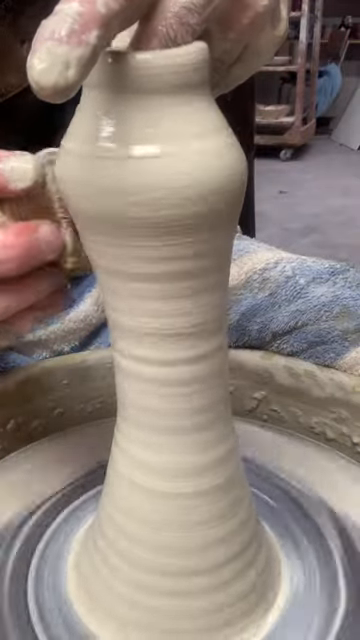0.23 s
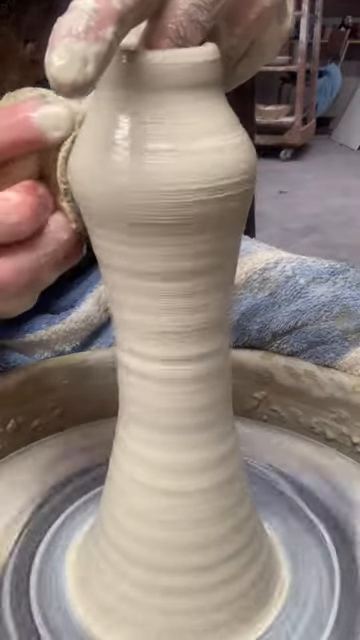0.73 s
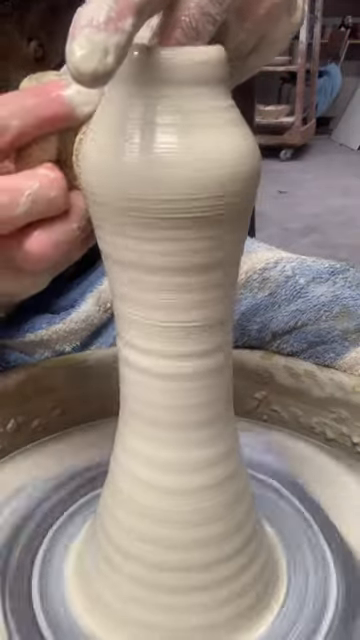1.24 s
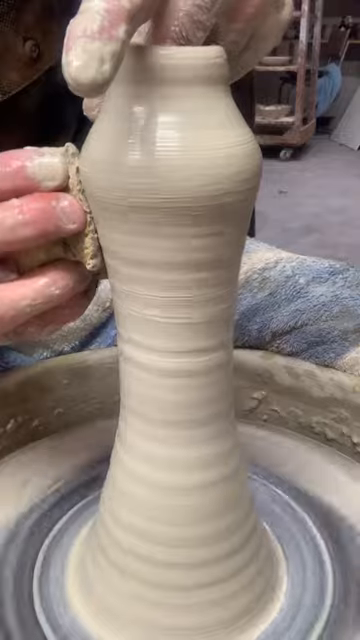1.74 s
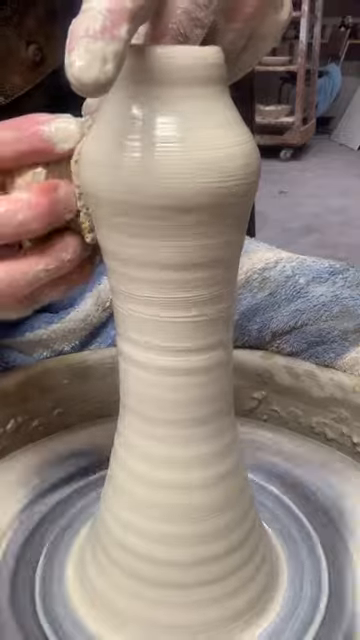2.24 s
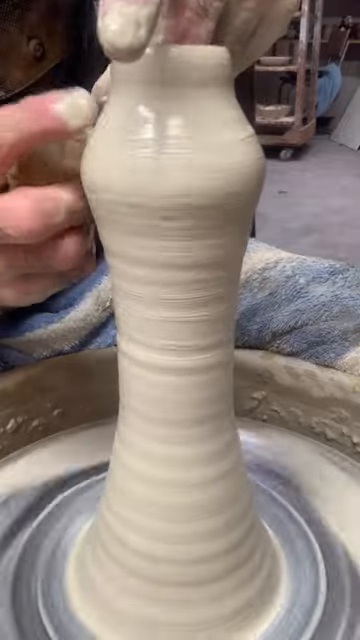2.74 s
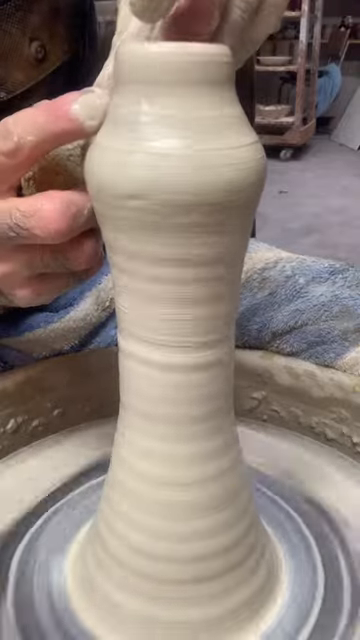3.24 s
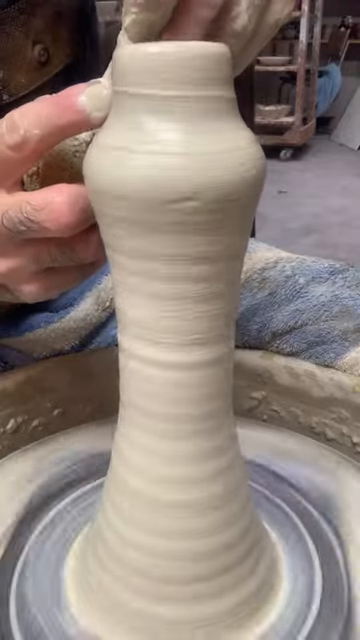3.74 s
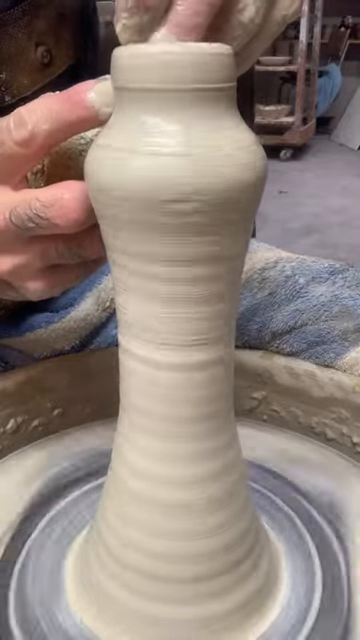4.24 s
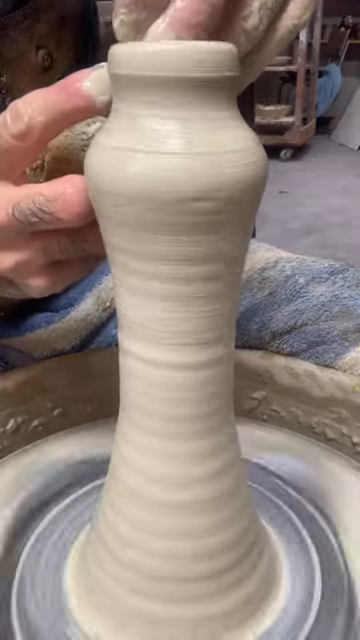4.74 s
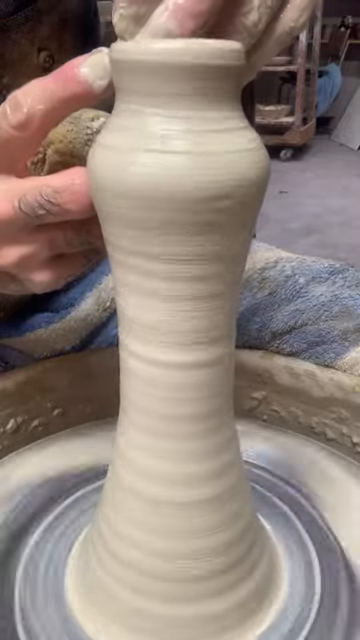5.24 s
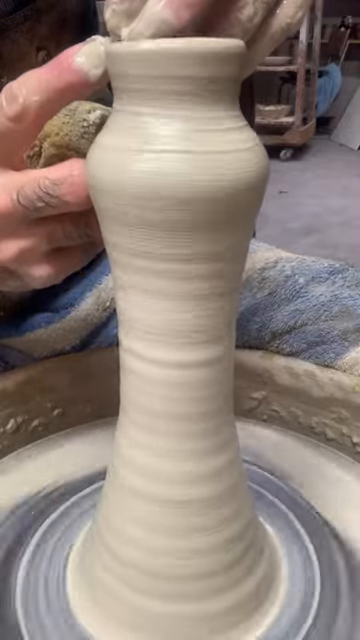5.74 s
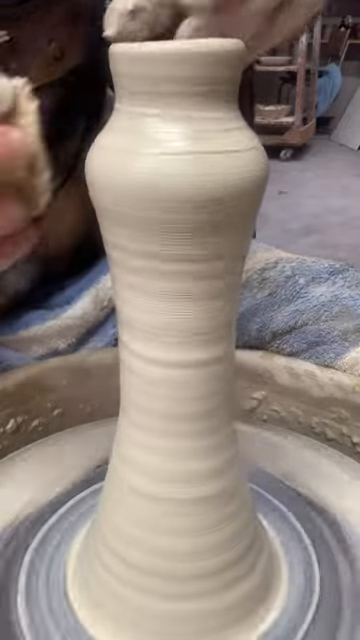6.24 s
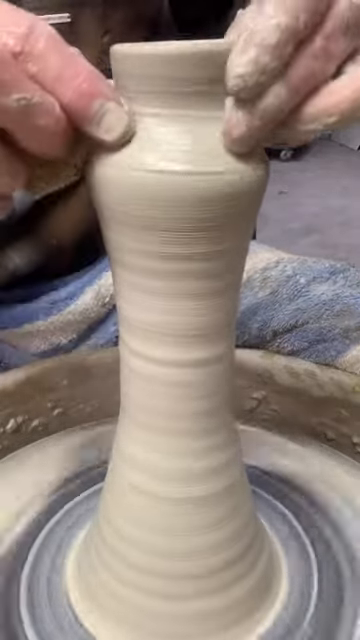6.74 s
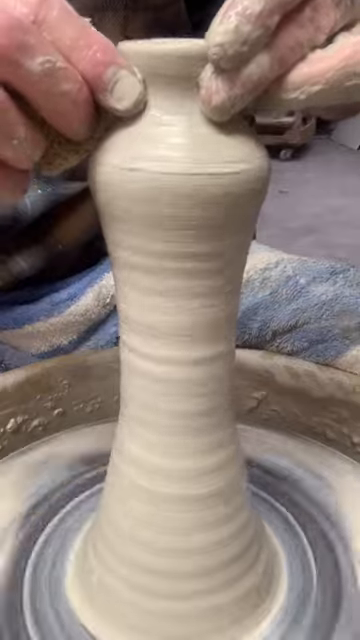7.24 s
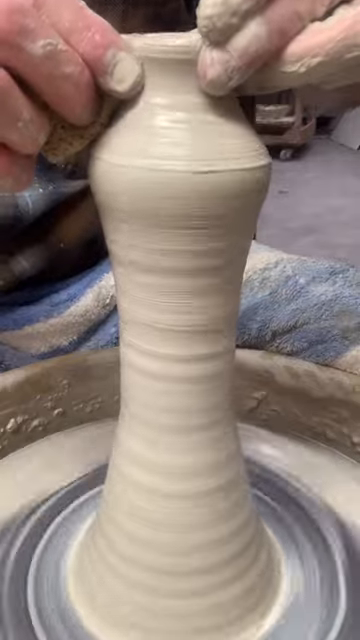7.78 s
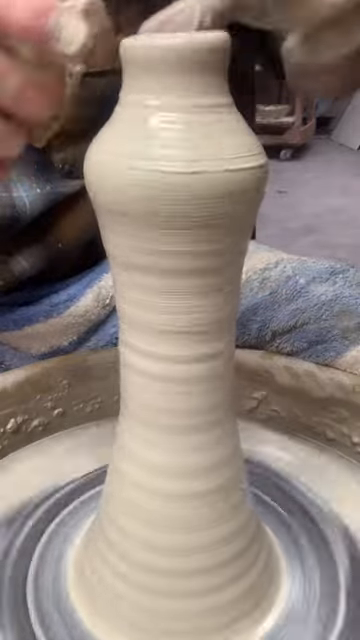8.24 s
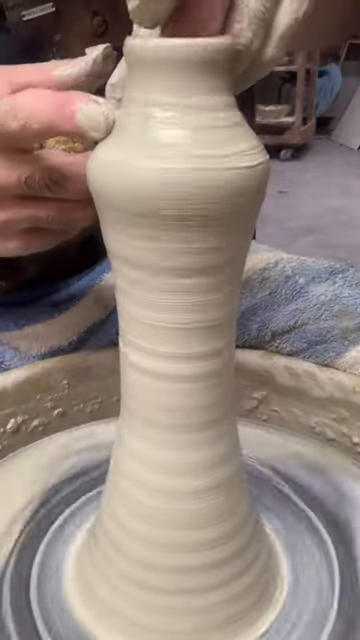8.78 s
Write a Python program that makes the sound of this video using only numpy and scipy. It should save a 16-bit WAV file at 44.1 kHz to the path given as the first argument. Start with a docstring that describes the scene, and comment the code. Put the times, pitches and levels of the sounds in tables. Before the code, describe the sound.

Continuous low motor hum and buzz from an electric potter's wheel, recorded within arm's reach. Soft, uneven low thumps recur with the turning head, over a muted belt drone. The thin motor whine dips slightly near the middle and recovers. Quiet high rasping and hiss flutter quickly, with scattered little chirps and very faint strokes of sponge and fingers on wet clay. Little room sound, no talking.

```python
"""The hum and buzz of an electric pottery wheel at throwing speed, close to the microphones, in a studio.
Rectified mains drives the hum and shakes the motor housing; the shaft whines, the brushes rasp and chirp.
The wheel head bumps and rumbles at two tight spots a turn, over a belt drone and dull knocks in the frame.
A wet sponge and fingers swish faintly on the turning clay.
Tones are sines in turn with the parts; the rest is stereo noise, coloured and swelled."""
import sys
import numpy as np
from scipy import signal
from scipy.fft import rfft, irfft, next_fast_len
from scipy.io import wavfile
from scipy.ndimage import uniform_filter1d, map_coordinates

SR = 44100
rng = np.random.default_rng(int(sys.argv[2]) if len(sys.argv) > 2 else 0)


def master(y):
    """Save y as 16-bit WAV."""
    cut = np.clip(np.atleast_2d(y).T, -1, 1)
    pcm = np.round(cut * 32767)  # scale
    wavfile.write(sys.argv[1], SR, pcm.astype(np.int16))


N = 397341
TIME = np.arange(N) / SR
RECTIFIED_MAINS_HZ = 119.968
SHAFT_TURNS_PER_WHEEL_TURN, SHAFT_TURNS_PER_BELT_LAP = 12.6, 7.87
# motor shaft: t/s, speed/(turns per s), whine level/dB
SHAFT_RUN = [(0, 19.9, -54.5), (1.6, 19.9, -50.5), (2.3, 19.7, -51.5), (2.9, 20.1, -51), (3.6, 19.8, -50),
             (4, 19.2, -50), (4.35, 18.82, -48.5), (5, 19.08, -49), (6, 19.25, -47.5), (7, 19.33, -47.5),
             (7.7, 19.35, -50.5), (8.3, 19.2, -47), (9, 19.5, -49.5)]


def hum(waver_db=2.0, sway_cycles=0.013, low_waver_db=0.87, throb_waver_db=1.0, side_waver_db=3):
    """Magnetic pull at twice the mains rate; multiple 1 swells with hands, wheel, belt; 2 throbs with wheel."""
    # motor hum: multiple of rectified mains, level/dB, left-right/dB, left lead/rad
    partials = [(1, -19.2, .6, 0), (2, -33.2, -.3, -.5), (3, -52.5, -5, -2.7), (4, -43.2, -5, -1.5),
                (5, -59.5, -8, -2.3), (6, -52.5, 0, 3.1), (7, -62.5, -1, 3), (8, -62, 0, -1),
                (9, -57.5, .8, -1.2), (12, -67, 2, -1.8)]
    # weaker tones beside it: f/Hz, level/dB, left-right/dB, left lead/rad
    side_tones = [(220, -56, -2.6, -.4), (260, -45, -1.8, -.6), (440, -58, -2.8, -1.3),
                  (500, -56.5, -3.9, -1.6), (540, -64, -3, -1.9)]
    # hands loading the motor: t/s, level added to multiple 1/dB
    load = [(0, -1), (.75, 2), (1.15, -0.3), (1.5, 1.2), (2.2, 0), (2.65, 1.4), (3.7, 0), (3.92, -0.5),
            (4.15, 1), (5.0, -0.6), (5.9, 2.5), (6.55, -1.2), (7.25, -1), (7.85, 1.5), (8.15, -1.6),
            (9, -1)]
    (load_db,) = curves(load)
    wheel = wheel_turns()
    level_db = [db + waver_db * wobble(5.6) for _, db, _, _ in partials]

    level_db[0] = partials[0][1] + load_db + low_waver_db * wobble(9)
    level_db[0] += swing(wheel, depth_db=1.0, place=0.52)
    level_db[0] += swing(belt_laps(), depth_db=1.1, place=0.66)

    level_db[1] = partials[1][1] + throb_waver_db * wobble(12)
    level_db[1] += swing(wheel, depth_db=1.1, place=0.87)
    level_db[1] += swing(2 * wheel, depth_db=3.6, place=0.93)

    out = np.zeros((2, N))
    for (k, _, pan_db, lead), db in zip(partials, level_db):
        cycles = k * RECTIFIED_MAINS_HZ * TIME + sway_cycles * wobble(8)
        out += amp(db) * tone(cycles, pan_db, lead)
    for hz, db, pan_db, lead in side_tones:
        cycles = hz * TIME + 0.019 * wobble(5)
        out += amp(db + side_waver_db * wobble(5.0)) * tone(cycles, pan_db, lead)
    return out


def wheel_head(lumpy_db=2.0):
    """The loaded head bumps at tight spots, then rocks and shakes the frame; dull knocks add to the shaking."""
    # slow rumble level: t/s, level added/dB
    rumble_level = [(0, 2), (.25, -4), (.55, 2), (1.15, 1), (1.75, -3.5), (2.5, 2.5), (3.05, -2.5),
                    (3.5, -2.5), (4.35, 1), (5, -3.5), (5.7, 0.5), (7.1, -2.5), (7.6, 2.5), (8.2, -1.5),
                    (9, 1.5)]
    # dull frame knocks: t/s, level/dB
    knock_list = [(0.551, -24), (.83, -22.5), (5.28, -25.5), (5.69, -25), (7.26, -21.5), (8.96, -23)]
    # spectra of rumble, frame, bumps: f/Hz, relative density/dB
    rumble_spectrum = [(18, -30), (30, -36.5), (35, -15), (43, -1), (48, -9.5), (57, -4), (64, -16.5),
                       (90, -44), (200, -92.5)]
    frame_spectrum = [(45, -44.5), (66, -9.5), (82, 6.5), (95, -2), (110, 2), (135, -7.5), (180, -26.5),
                      (400, -75)]
    bump_spectrum = [(150, -32.5), (240, -3), (290, 4.5), (350, -5.5), (410, -5.5), (480, -20),
                     (800, -55.5)]
    rumble_db, frame_db, frame_jolt_db = -27.5, -30, -13  # two floors; frame's part of each jolt
    bumps, jolts = tight_spots()
    laps = belt_laps()
    (level_db,) = curves(rumble_level)

    swell_db = level_db + swing(laps, depth_db=0.62, place=0.93) + lumpy_db * wobble(9.5)
    rocking = amp(swell_db) * np.hypot(amp(rumble_db), jolts)
    shaking = np.hypot(amp(frame_db), amp(frame_jolt_db) * jolts)
    shaking *= amp(swing(laps, depth_db=2.5, place=0.16))
    knocks = sum(amp(db) * burst(s, length_s=0.15) for s, db in knock_list)

    rumble = rocking * steadied(rush(colour(rumble_spectrum)), span_s=0.1)
    frame = np.hypot(shaking, knocks) * steadied(rush(colour(frame_spectrum)), span_s=0.15)
    soft_bumps = bumps * steadied(rush(colour(bump_spectrum)), span_s=0.057)
    return rumble + frame + soft_bumps


def tight_spots():
    """Each pass of a tight spot gives a short bump, then a jolt that dies away: the two envelopes."""
    # place in the wheel turn/(0-1), mean bump level/dB, jolt scale/dB, jolt decay to 1/e/s
    spots = [(.225, -37, -18.5, 0.091), (0.683, -36.5, -18, .22)]
    bump_s, bump_scatter_db = 0.06, 2.5
    jolt_lag_s, jolt_rise_s = 0.0055, 0.027
    wheel, bumps, jolts = wheel_turns(), np.zeros(N), np.zeros(N)
    for place, bump_db, jolt_db, decay_s in spots:
        for s in np.interp(np.arange(place, wheel[-1]), wheel, TIME):
            age_s = np.maximum(TIME - s - jolt_lag_s, 0)
            rise = 1 - np.exp(-(age_s / jolt_rise_s) ** 2)
            bumps += amp(bump_db + bump_scatter_db * rng.standard_normal()) * burst(s, bump_s)
            jolts += amp(jolt_db) * rise * np.exp(-age_s / decay_s)
    return bumps, jolts


def belt():
    """The drive belt drones as coloured noise, swelling slightly once a shaft turn."""
    # belt spectrum: f/Hz, relative density/dB
    spectrum = [(100, -18.5), (135, -1.5), (153, 6), (166, 1), (205, -7), (255, 5.5), (280, 1), (315, -16),
                (350, -9), (410, -15), (800, -61.5)]
    return amp(-35.5 + swing(shaft_turns(), depth_db=0.8, place=0)) * rush(colour(spectrum))


def motor():
    """Housing and brushes swell together, once a turn of the slightly uneven shaft."""
    shaft = np.cos(2 * np.pi * (shaft_turns() + 0.055 * wobble(6.6)))
    return housing(shaft) + brushes(shaft)


def housing(shaft):
    """Current pulses and the turning shaft shake the housing, which rings at its resonances."""
    # housing resonances: f/Hz, width/Hz, relative level/dB
    modes = [(470, 23, -3.5), (561, 23, -11.5), (635.6, 28, -10), (850, 12, -20.5), (908, 6.3, -10),
             (949, 29, -14.5), (1095, 20, -9.5), (1250, 94, -19), (1368, 69, -15), (1520, 34, -27),
             (1853, 69, -26.5)]
    current = np.cos(2 * np.pi * RECTIFIED_MAINS_HZ * TIME)
    shake = amp(0.52 * current + 1.1 * shaft + 1.4 * wobble(7.3))
    level_db = -45.5 + swing(2 * wheel_turns(), depth_db=0.17, place=0)
    return amp(level_db) * unit(shake * rush(resonances(modes), lean=0.55))


def brushes(shaft):
    """Brushes rasp in their holders and hiss, strongest once a shaft turn; the wheel presses and eases the rasp."""
    # brush holder resonances: f/Hz, width/Hz, relative level/dB
    holders = [(2340, 130, -8.5), (2436, 35, -.5), (2624, 26, -5.5), (2648, 37, 0), (2850, 50, -9),
               (2960, 50, -8), (3180, 90, -5), (3600, 100, -13), (3790, 90, -14), (4130, 120, -11)]
    # hiss spectrum: f/Hz, relative density/dB
    hiss_spectrum = [(300, -9), (2000, 0.5), (3400, 0.5), (4150, 4), (4900, -8), (6500, -11.5), (8000, -14),
                     (9700, -5.5), (11100, 1), (11500, -6)]
    wheel_db = swing(2 * wheel_turns(), depth_db=0.79, place=0.01)
    rasp = np.zeros((2, N))
    for hz, width_hz, db in holders:
        catch_db = 5.0 * wobble(35)  # each holder catches on its own
        ring = np.sqrt(width_hz) * rush(resonances([(hz, width_hz, 0)]), lean=0.3)
        rasp += amp(db + 2 * shaft + wheel_db + catch_db) * ring
    hiss = amp(0.62 * shaft + 0.5 * wobble(4)) * rush(colour(hiss_spectrum), lean=0.2)
    return amp(-60.5) * shell(rasp, share=0.57, t60_s=0.021) + amp(-62.0) * shell(hiss, share=0.93, t60_s=0.1)


def whine(flutter_db=5.0):
    """Armature slots pass the magnets; tones sag as hands brake the wheel and slide over casing resonances."""
    # casing radiation of the overtones: f/Hz, level re whine level/dB
    casing = [(930, -17), (1400, -19), (1850, -22.5), (2320, -26), (2800, -32.5), (3200, -26), (3330, -34),
              (3750, -35), (4170, -35), (4630, -41), (4800, -46)]
    slots = 24
    speed, level_db = curves(SHAFT_RUN)
    passes = slots * shaft_turns() + 0.014 * wobble(20)
    out = amp(1.0 + 1.5 * wobble(7.3)) * tone(passes, pan_db=-6, lead=-1.1)
    for k in range(2, 11):
        overtone_db = along(casing, k * slots * speed) + flutter_db * wobble(12)
        out += amp(overtone_db) * tone(k * passes, pan_db=1.5, lead=-1.96)
    return amp(level_db) * out


def chirps(length_s=0.027, count=26):
    """A brush sticks and sings briefly near a mode of its holder; fainter chirps fall at random."""
    # loudest chirps of brushes on commutator: t/s, level/dB, f/Hz
    loud = [(0.7, -51, 2650), (1.56, -52.5, 2450), (1.658, -52, 2660), (2.72, -52, 2630),
            (6.07, -57.5, 2615), (6.33, -51, 2645), (6.94, -54, 2631), (7.68, -58, 2420),
            (7.94, -54.5, 2470)]
    faint = [(rng.uniform(0, N / SR), rng.normal(-61, 2.5), rng.normal(2600, 90)) for _ in range(count)]
    out = np.zeros((2, N))
    for s, db, hz in list(loud) + faint:
        out += amp(db) * burst(s, length_s) * tone(hz * TIME, pan_db=0.5, lead=-2.1)
    return out


def clay(grain_db=1.0):
    """Wet clay slides under sponge and fingers in soft, finely grained swishes."""
    # strokes: t/s, length/s, level before a 6 dB lift/dB
    strokes = [(1.163, 0.15, -68.5), (1.47, .1, -67.5), (2.162, .012, -69.5), (2.489, .24, -70),
               (3.556, .45, -76.5), (4.667, .06, -70), (5.641, 0.089, -70.5), (6.167, .08, -73.5),
               (6.645, .07, -73), (7.641, .18, -66.5), (7.949, 0.068, -68)]
    # clay spectrum: f/Hz, relative density/dB
    spectrum = [(500, -33.5), (2000, 5.5), (4000, 0), (7000, 0.5), (10000, -1), (11500, -3.5)]
    pressure = sum(amp(db + 6) * burst(s, length_s) for s, length_s, db in strokes)
    return pressure * unit(amp(grain_db * wobble(290)) * rush(colour(spectrum), lean=0.1))


def shaft_turns():
    """Turns of the motor shaft so far."""
    return np.cumsum(curves(SHAFT_RUN)[0]) / SR


def wheel_turns():
    """Turns of the wheel head so far."""
    return shaft_turns() / SHAFT_TURNS_PER_WHEEL_TURN


def belt_laps():
    """Laps of the drive belt so far."""
    return shaft_turns() / SHAFT_TURNS_PER_BELT_LAP


def swing(cycles, depth_db, place):
    """Level in dB that rises and falls by depth_db once a cycle, peaking at place (0-1)."""
    return depth_db * np.cos(2 * np.pi * (cycles - place))


def amp(db):
    """Decibels to gain."""
    return 10 ** (np.asarray(db) / 20)


def unit(x):
    """Scale to rms 1."""
    return x / np.sqrt(np.mean(x ** 2) + 1e-20)


def along(points, hz):
    """(Hz, value) points read on a log frequency axis."""
    f, v = np.transpose(points)
    return np.interp(np.log(hz + 1), np.log(f + 1), v)


def curves(rows):
    """One value per sample for each column after the time."""
    s, *cols = np.transpose(rows)
    return [np.interp(TIME, s, c) for c in cols]


def wobble(rate_hz):
    """Smooth random curve through rate_hz normal knots a second."""
    knots = rng.standard_normal(int(N * rate_hz / SR) + 4)
    return map_coordinates(knots, [TIME * rate_hz])


def burst(s, length_s):
    """Smooth swell of height 1 around time s, length_s wide at 1/e."""
    return np.exp(-np.minimum((2 * (TIME - s) / length_s) ** 2, 50))


def tone(cycles, pan_db, lead):
    """Sine of rms 1 at the two ports: left-right level in dB, left lead in radians."""
    ear = np.array([[0.5], [-0.5]])
    return unit(amp(ear * pan_db) * np.sin(2 * np.pi * (cycles + rng.random()) + ear * lead))


def filtered(x, response):
    """x times a response of frequency."""
    m = next_fast_len(N + SR // 2)
    return irfft(rfft(x, m) * response(np.fft.rfftfreq(m, 1 / SR)), m)[..., :N]


def colour(points):
    """Response of a short spectrum."""
    return lambda hz: amp(along(points, hz))


def resonances(modes):
    """Response of overlapping resonances, added in power."""
    def power(hz, centre, width, db):
        damping = (hz * width) ** 2
        return amp(2 * db) * damping / ((centre ** 2 - hz ** 2) ** 2 + damping)
    return lambda hz: np.sqrt(sum(power(hz, *mode) for mode in modes))


def rush(response, lean=0.5):
    """Stereo noise of rms 1; the share (lean) straight from the motor reaches the right port first."""
    # stereo width: f/Hz, side-mid/dB
    width = [(60, -31), (160, -25), (250, -10.5), (410, -5.5), (650, -3), (1050, -1), (1700, 0),
             (2740, 5.5), (4900, 9), (6500, 1), (8500, -7.5), (11000, -0.5)]
    a, b = rng.standard_normal((2, N))
    gradient = filtered(a, lambda hz: -1j * lean) + np.sqrt(1 - lean ** 2) * b

    def mid_side(hz):
        angle = np.arctan(amp(along(width, hz)))
        return response(hz) * [np.cos(angle), np.sin(angle)]
    mid, side = filtered(np.array([a, gradient]), mid_side)
    return unit(np.array([mid + side, mid - side]))


def steadied(x, span_s):
    """Even out the swells of a noise that last longer than span_s."""
    power = uniform_filter1d(np.mean(x ** 2, axis=0), max(1, int(span_s * SR)))
    return unit(x / np.sqrt(np.abs(power) + 1e-6))


def shell(x, share, t60_s):
    """Dense small modes of the casing put a fine fixed grain on a spectrum; rms 1."""
    t = np.arange(SR // 10) / SR
    ring = rng.standard_normal(len(t)) * amp(-60 * t / t60_s)
    rung = signal.fftconvolve(x, [ring / np.linalg.norm(ring)], axes=1)[:, :N]
    return unit(np.sqrt(1 - share) * x + np.sqrt(share) * rung)


def scene():
    """Motor, wheel and clay, all within arm's reach."""
    return hum() + wheel_head() + belt() + motor() + whine() + chirps() + clay()


def record(dry):
    """Nothing is kept above the band limit."""
    top_hz = 11500
    return filtered(dry, lambda hz: hz < top_hz)


dry = scene()
out = record(dry)
master(out)
```